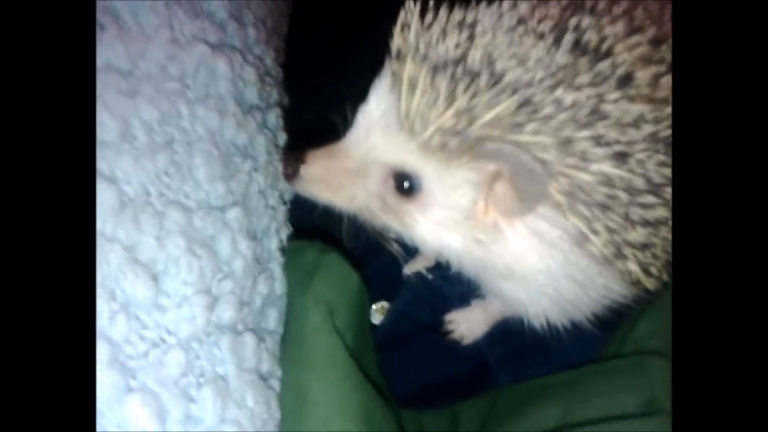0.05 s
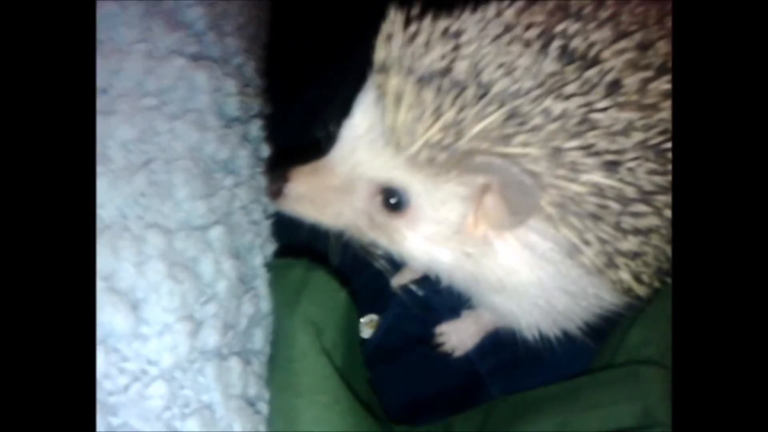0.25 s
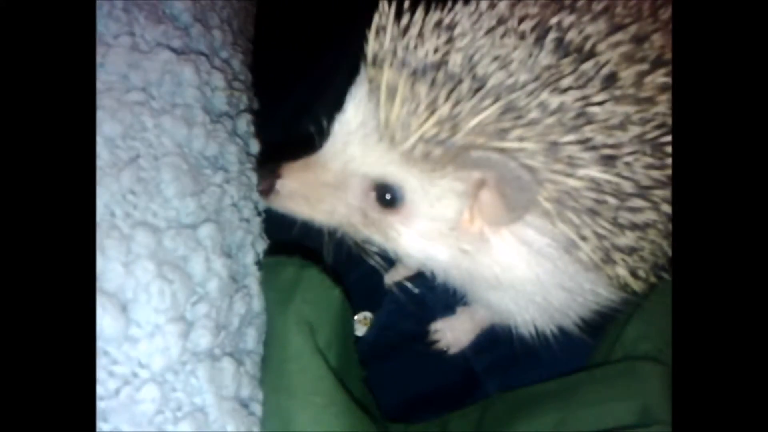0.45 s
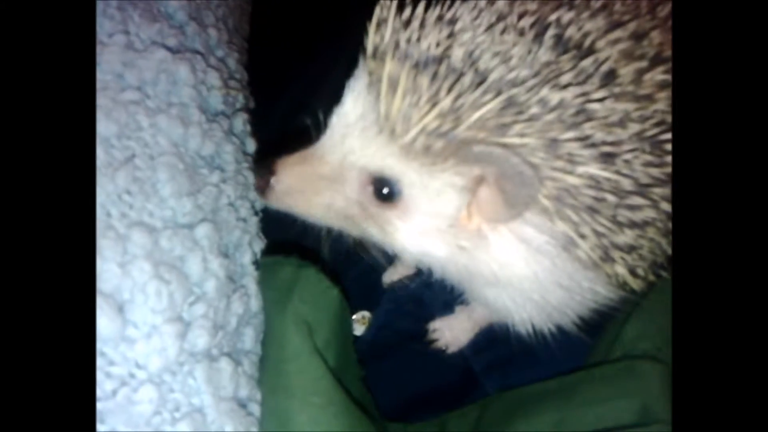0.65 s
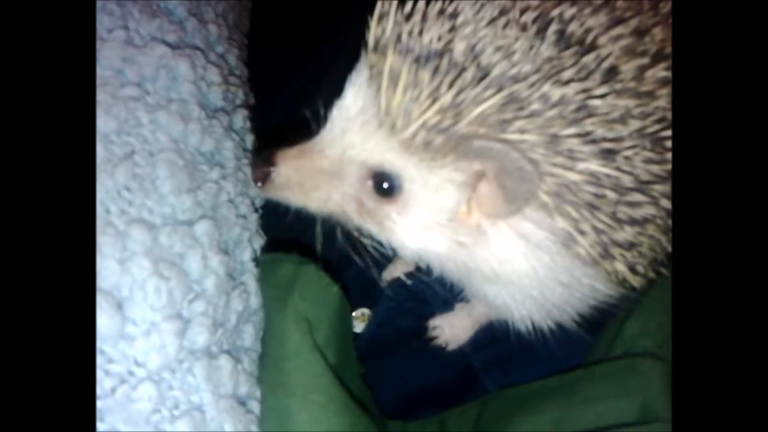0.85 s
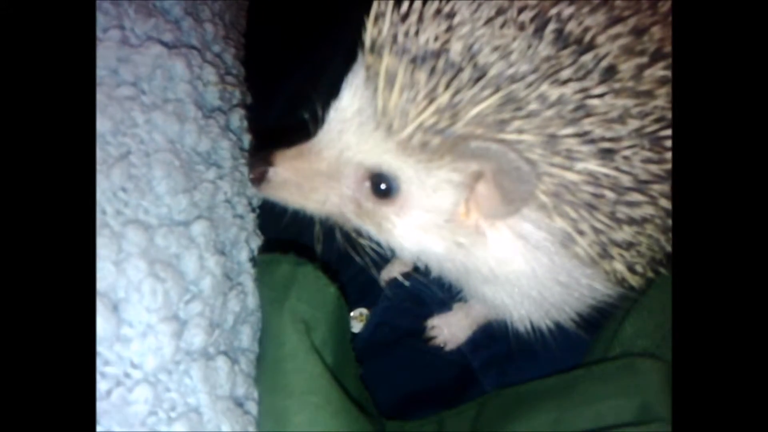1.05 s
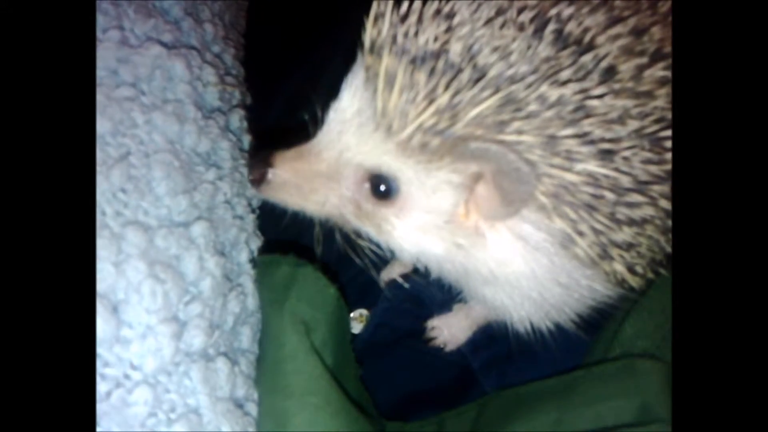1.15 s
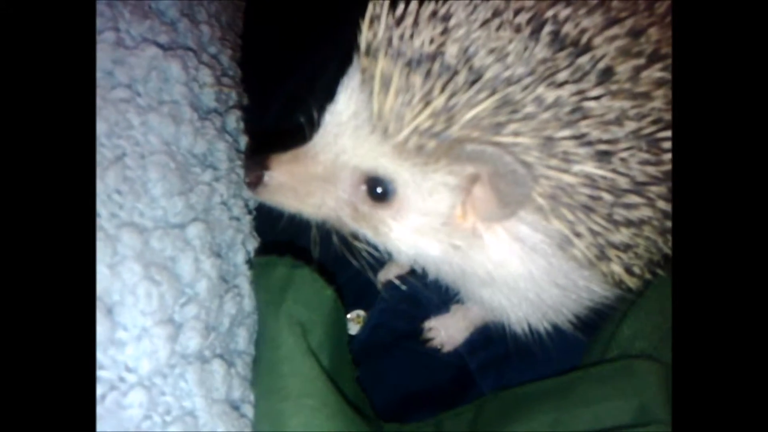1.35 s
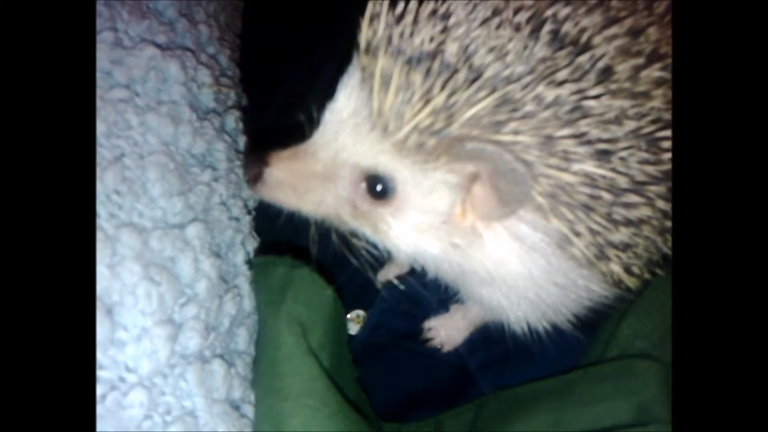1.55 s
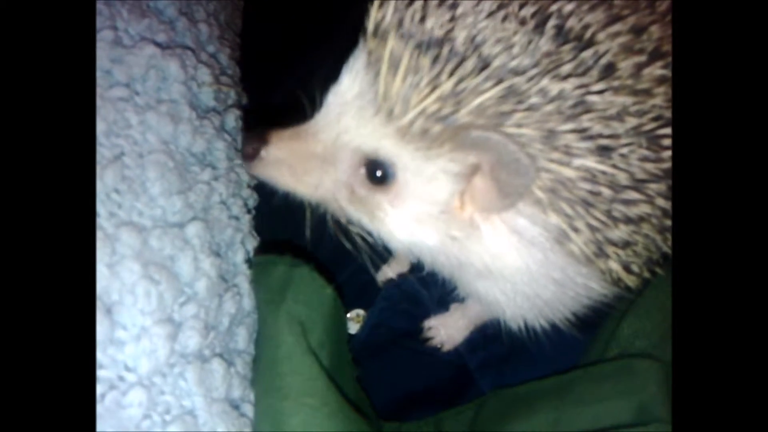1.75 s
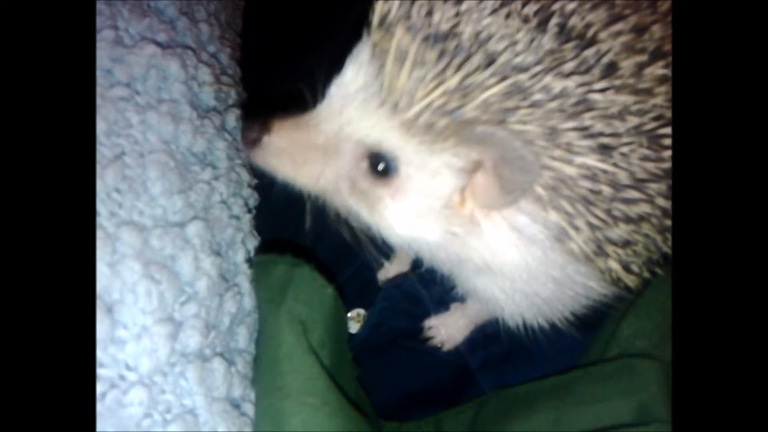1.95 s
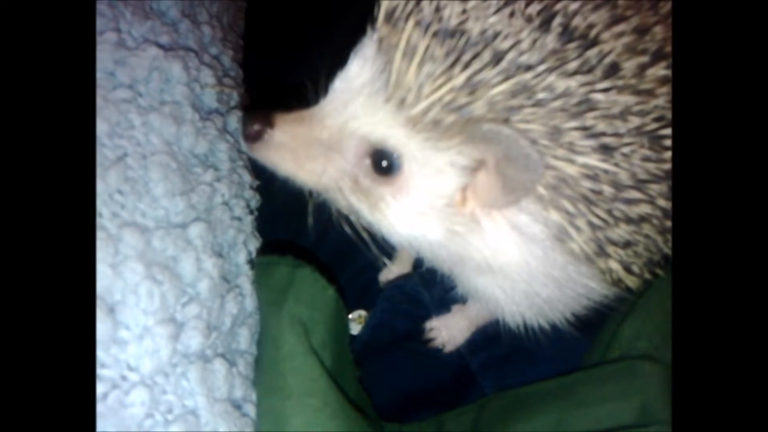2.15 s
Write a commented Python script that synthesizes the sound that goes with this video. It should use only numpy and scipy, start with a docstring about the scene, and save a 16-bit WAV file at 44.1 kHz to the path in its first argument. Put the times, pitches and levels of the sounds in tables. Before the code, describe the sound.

Wet, hollow clicks of a hedgehog's snout, close and slightly left. Fleece rustles softly from the start, with a tiny falling squeak near 0.1 s. Strong clicks begin at 0.23 s, cluster until 0.6, then slow at 0.74 and 0.9, weaker near 1.1 and 1.3. Afterwards only faint ticks, soft pats and scuffs to 2.2 s, over low rumble, faint hum, hiss and thin high whines.

```python
"""Short wet clicks come in a slowing, fading run, close by, as a hedgehog noses at a fleece blanket.
The fleece rustles and squeaks faintly at first, then only stirs under soft pats, in a quiet room.
Under it lie a low rumble, a faint hum and the recorder's hiss with two thin whines.
Clicks are damped ringing set off by soft contacts; fleece, pats, rumble and hiss are shaped noise;
squeak, hum and whines are sine waves. Scatter and room echoes of the clicks are fading noise."""
import sys
import numpy as np
from scipy import signal
from scipy.fft import rfft, irfft
from scipy.io import wavfile

SR = 44100
rng = np.random.default_rng(int(sys.argv[2]) if len(sys.argv) > 2 else 0)


def transcribe(u):
    """Save the signal u as a 16-bit wav file named by the first command-line argument.

    u: samples, shape (n,) or (channels, n), limited to [-1, 1]; the rate is SR.
    q: integer samples, one column per channel.
    """
    v = np.clip(np.atleast_2d(u).T, -1, 1)
    q = np.round(v * 32767).astype(np.int16)
    wavfile.write(sys.argv[1], SR, q)


N = 97020
T = np.arange(N) / SR  # time of each sample, in seconds
HZ = np.maximum(np.fft.rfftfreq(N, 1 / SR), 1)  # the frequencies that make up a sound of this length

# what the bright part of a click rings with, before each click's own pitch factor:
# (pitch [Hz], width [Hz], level [dB])
SNAP_RINGING = [(3023, 465, -2.5), (3700, 495, -3.3), (5170, 760, 1.5)]


def from_db(db):
    """Turn decibels into a gain to multiply by."""
    return 10 ** (np.asarray(db) / 20)


def rms_one(x):
    """Scale a sound to an average power of one."""
    return x / np.sqrt(np.mean(x ** 2) + 1e-20)


def at_hz(points):
    """Read a table between its points, with frequency spaced by octaves."""
    hz, value = np.transpose(points)
    return np.interp(np.log(HZ), np.log(hz), value)


def pan(right_db):
    """Left and right gains: the left stays as it is, the right changes by right_db."""
    return from_db([[0], [right_db]])


def cut(x, hz, kind, order=2):
    """Remove the treble ("low" passes) or the bass ("high" passes) with a smooth filter."""
    sections = signal.butter(order, min(hz, .45 * SR), kind, fs=SR, output="sos")
    return signal.sosfilt(sections, x + 1e-18)


def colour(x, spectrum):
    """Make some pitches of a steady noise stronger than others, then set its power to one."""
    shaped = rfft(x) * from_db(at_hz(spectrum))
    return rms_one(irfft(shaped, N))


def stereo_noise(likeness):
    """White noise whose two channels are alike (1), unrelated (0) or opposed (-1)."""
    mid, side = rfft(rng.standard_normal((2, N)))
    likeness = np.clip(likeness, -.99, .99)
    shared = np.sqrt((1 + likeness) / 2) * mid
    opposed = np.sqrt((1 - likeness) / 2) * side * [[1], [-1]]
    return irfft(shared + opposed, N)


def drift(rate):
    """Random wandering with spread 1; it is weak at frequencies above rate [Hz]."""
    smooth = rfft(rng.standard_normal(N)) / (1 + (HZ / rate) ** 2)
    return rms_one(irfft(smooth, N))


def delayed(x, seconds):
    """The same sound, later."""
    return np.interp(T - seconds, T, x, left=0, right=0)


def ring(strikes, modes):
    """Soft contacts (s, dB, top Hz, pitch factor) set off fading tones, a little different each time."""
    vary_db, size = .9, 2048  # chance spread of each tone's level; length of each ring in samples
    out = np.zeros(N)
    impulse = np.eye(1, size)[0]
    for s, level_db, top_hz, factor in strikes:
        contact = cut(impulse, top_hz, "low", order=4)  # a softer contact has less treble
        i = int(s * SR)
        for k, (hz, width, db) in enumerate(modes):
            r = np.exp(-np.pi * width * factor / SR)  # a wider mode fades sooner
            w = 2 * np.pi * hz * factor / SR
            sign = (-1) ** k
            gain = sign * from_db(level_db + db + vary_db * rng.standard_normal())
            tone = signal.lfilter([.5, 0, -.5], [1, -2 * r * np.cos(w), r * r], contact)
            out[i:i + size] += gain * tone
    return out


def rumble():
    """Low room rumble: noise that is strongest in the bass and much alike in both channels."""
    # strength of each pitch in the rumble: (frequency [Hz], level [dB])
    rumble_colour = [(20, 6), (45, -16), (70, 6), (120, 3.5), (180, 7), (230, -0.5), (310, -8.5), (420, -8),
                     (700, -14), (1500, -19), (4000, -19), (15000, -25)]
    noise = stereo_noise(.75)
    return from_db(-59.5) * pan(right_db=-3) * colour(noise, rumble_colour)


def hiss():
    """The recorder's hiss: noise shaped by pitch, its level sinking unevenly."""
    # strength of each pitch in the hiss: (frequency [Hz], level [dB])
    hiss_colour = [(100, 2), (1000, -9.5), (2000, -10), (3200, -3), (4500, -1.5), (6000, -2), (7500, -6),
                   (10000, -2), (11500, 2.5), (15500, 1)]
    # how alike left and right are, later held within -0.99 and 0.99: (frequency [Hz], likeness [1])
    hiss_likeness = [(500, -0.31), (2400, 0.21), (4400, -0.39), (7500, -1.15), (11500, -0.66),
                     (15000, -0.76)]
    # changes over time, added to the base level: (time [s], level [dB])
    hiss_level = [(0, 4), (.3, 3), (.6, 0.5), (1.0, 2), (1.4, 0.4), (1.8, 1.5), (2.2, 0)]
    base_db = -49
    level_db = base_db + np.interp(T, *np.transpose(hiss_level))
    noise = stereo_noise(at_hz(hiss_likeness))
    return from_db(level_db) * pan(right_db=-0.2) * colour(noise, hiss_colour)


def hum():
    """A faint low sine wave, almost only on the left, wavering in level and slightly in phase."""
    hum_hz, hum_db, waver_db = 153.8, -67.5, 3.0
    level = from_db(hum_db + waver_db * drift(1.2))
    phase = 2 * np.pi * hum_hz * T + .5 * drift(2.7)
    return pan(right_db=-50) * level * np.sqrt(2) * np.sin(phase)


def whines():
    """Two thin, steady electrical sine waves, opposed in the two channels."""
    # pitch of each whine: (frequency [Hz])
    whine_pitches = [11042.5, 12752.8]
    # strength of each whine: (left level [dB], right level [dB])
    whine_levels = [(-53.6, -58.5), (-54.2, -60.5)]
    out = np.zeros((2, N))
    for hz, (left_db, right_db) in zip(whine_pitches, whine_levels):
        gains = from_db([[left_db], [right_db]]) * [[1], [-1]]
        out += gains * np.sqrt(2) * np.sin(2 * np.pi * hz * T)
    return out


def fleece():
    """Rubbing fleece: smooth noise plus the tiny snaps of single fibres."""
    # how strongly the fleece is rubbed: (time [s], level [dB])
    rub_level = [(0, -51), (.1, -50.5), (.2, -53.5), (.29, -71), (.35, -49), (.41, -75), (.52, -60.5),
                 (.68, -69), (1.0, -81), (1.35, -58.5), (1.44, -70.5), (1.56, -57.5), (1.66, -87),
                 (2.2, -62)]
    # strength of each pitch in the rubbing: (frequency [Hz], level [dB])
    rub_colour = [(30, -14), (80, 4), (200, 1), (300, -7.5), (440, 0.5), (560, -6.5), (660, -1.5),
                  (850, -14.5), (1150, -10.5), (1450, -6), (2000, -7), (3200, -8), (5000, -9.5),
                  (7000, -21.5), (9000, -10), (15000, -18)]
    fibres_per_s, spread_db, fibre_db = 2100, 3, -3  # fibre_db is compared with the smooth noise
    snaps = rng.random(N) < fibres_per_s / SR
    sizes = from_db(spread_db * np.minimum(rng.exponential(1, N), 4))
    fibres = snaps * sizes * rng.choice([-1, 1], N)
    noise = stereo_noise(likeness=0.49) + from_db(fibre_db) * rms_one(fibres)
    level_db = np.interp(T, *np.transpose(rub_level))
    return pan(right_db=-1.0) * colour(noise, rub_colour) * from_db(level_db)


def squeak():
    """The nose drags on the cloth: one short falling sine note, roughened in pitch and level."""
    # path of the note: (time [s], pitch [Hz], level [dB])
    squeak_path = [(.045, 515, -76), (.065, 470, -56), (0.086, 429, -55.5), (.105, 417, -53),
                   (.12, 398, -70)]
    rough, flutter_hz = 0.17, 60
    s, hz, db = np.transpose(squeak_path)
    phase = 2 * np.pi * np.cumsum(np.interp(T, s, hz)) / SR + rough * drift(flutter_hz)
    level = np.interp(T, s, from_db(db), left=0, right=0) * (1 + rough * drift(flutter_hz))
    return pan(right_db=-12.5) * level * np.sqrt(2) * np.sin(phase)


def shifts():
    """Soft pats and scuffs as the animal shifts: short swells of noise, each around its own pitch."""
    # pats and scuffs: (time of peak [s], width of swell [s], level [dB], pitch [Hz])
    pats = [(.107, 0.01, -55, 179), (.186, 0.0072, -55, 610), (.256, 0.0039, -54, 583),
            (0.343, 0.014, -52.5, 1450), (0.905, 0.016, -52.5, 1700), (1.332, 0.0044, -49.5, 570),
            (.68, 0.014, -55, 115), (1.14, 0.018, -55, 101), (1.256, 0.0022, -53.5, 438),
            (1.38, 0.017, -52, 131), (1.458, 0.0044, -56, 470), (1.526, 0.0046, -61, 560),
            (1.551, 0.014, -54, 152), (1.565, 0.02, -58.5, 384), (1.578, 0.022, -61.5, 75),
            (1.749, 0.0092, -57.5, 378), (1.751, 0.0054, -50.5, 161), (1.803, 0.0058, -56, 310),
            (1.84, 0.0074, -61.5, 555), (2.03, 0.0036, -57, 180), (2.176, .02, -52.5, 171),
            (2.18, 0.034, -58, 337)]
    width_octaves = .7
    half = 2 ** (width_octaves / 2)
    out = np.zeros((2, N))
    for s, width, db, hz in pats:
        bass_removed = cut(stereo_noise(likeness=0.52), hz / half, "high")
        band = rms_one(cut(bass_removed, hz * half, "low", order=4))
        swell = np.exp(-.5 * ((T - s) / width) ** 2)
        out += from_db(db) * swell * band
    return pan(right_db=-3) * out


def crackle(s, snap_db, count):
    """The wet film parts in tiny uneven snaps scattered just after each click."""
    from_s, to_s, crackle_db, top_hz = 0.0026, 0.0072, -20.5, 5000  # the level is added to the snap's
    lag, size = rng.random((len(s), 2, count)).transpose(1, 0, 2)
    when = s[:, None] + from_s + (to_s - from_s) * lag
    level_db = snap_db[:, None] + crackle_db + 20 * np.log10(.5 + size)
    strikes = [(t, db, top_hz, 1) for t, db in zip(when.flat, level_db.flat)]
    return ring(strikes, SNAP_RINGING)


def snout():
    """A bright snap, hollow knock and low thump make each click; the upper two echo from close by."""
    # snout clicks, before the level of each part is added: (time [s], low thump level [dB],
    # middle knock level [dB], bright snap level [dB], sharpness of contact [Hz],
    # thump pitch [Hz], knock pitch [Hz], snap pitch [Hz])
    click_list = [(0.169, -47, -42, -48, 3800, 115, 1470, 3000),
                  (0.2102, -50, -43, -46, 2600, 120, 1470, 3000),
                  (0.2202, -56, -45, -38, 4000, 112, 1470, 3000),
                  (0.2281, -29.5, -16, -20.5, 3140, 106, 1360, 3120),
                  (0.3070, -29.5, -13, -19.5, 4350, 118, 1385, 3000),
                  (0.3207, -32, -21.5, -26.5, 3040, 93, 1390, 2970),
                  (.3470, -55, -46, -38, 3800, 117, 1470, 3000),
                  (0.3763, -44, -42, -43, 2300, 116, 1500, 3000),
                  (0.4296, -50, -37, -29.5, 3080, 116, 1550, 3000),
                  (0.4513, -25.5, -13, -13.5, 4200, 112, 1380, 3000),
                  (0.4982, -29.5, -17.5, -16, 3750, 110, 1320, 3040),
                  (0.5927, -27, -17, -14, 3580, 103, 1354, 2980),
                  (0.7357, -29, -19, -17.5, 3030, 105, 1375, 3130),
                  (0.8795, -47.5, -48, -34.5, 3750, 104, 1470, 2960),
                  (0.9032, -32.5, -22.5, -25, 2960, 100, 1354, 3130),
                  (1.1060, -32, -30.5, -34.5, 3860, 109, 1330, 3100),
                  (1.1237, -48, -36, -37, 3240, 118, 1330, 3000),
                  (1.3073, -46.5, -48, -39, 3700, 119, 1520, 2980),
                  (1.3289, -34, -34.5, -28.5, 3530, 125, 1370, 2780),
                  (1.4577, -52, -44.5, -40, 4200, 180, 1420, 3000),
                  (1.5234, -49.5, -48, -46, 3000, 136, 1390, 3000),
                  (1.554, -52, -51, -38, 3660, 128.4, 1470, 2920),
                  (1.7511, -47, -45, -35.5, 2620, 96, 1520, 3130)]
    # ringing of thump and knock before each click's pitch factor: (pitch [Hz], width [Hz], level [dB])
    thump_modes = [(99, 137, -4.5), (160, 396, 5), (440, 154, -12.5)]
    knock_modes = [(603, 175, -11.5), (1400, 430, 3), (2305, 457, -0.06)]
    # surfaces close by: (delay [s], level [dB])
    near_echoes = [(.00127, -13.5), (.005, -28)]
    added_thump_db, added_knock_db, added_snap_db, added_crack_db = 6.5, 0.5, 3, -8
    snap_lead_s, thump_lag_s = .00057, 0.00035  # the treble comes first, the bass last
    s, thump_db, knock_db, snap_db, top_hz, thump_hz, knock_hz, snap_hz = np.transpose(click_list)

    thump_factor = thump_hz / thump_modes[0][0]
    thump = ring(zip(s + thump_lag_s, thump_db + added_thump_db, top_hz, thump_factor), thump_modes)
    thump = cut(thump, 65, "high")

    knock_factor = knock_hz / knock_modes[1][0]
    knock = ring(zip(s, knock_db + added_knock_db, top_hz, knock_factor), knock_modes)

    snap_s = s - snap_lead_s
    snap_factor = snap_hz / SNAP_RINGING[0][0]
    snap = ring(zip(snap_s, snap_db + added_snap_db, top_hz, snap_factor), SNAP_RINGING)
    snap = -cut(snap, 6900, "low", order=6)
    # the faint top of the snap: one mode (Hz, width Hz, dB) at the same pitch every time
    crack_modes = [(9600, 2800, 0)]
    snap += ring(zip(snap_s, snap_db + added_crack_db, 2 * top_hz, np.ones(len(s))), crack_modes)
    snap += crackle(s, snap_db, count=5)

    out = pan(right_db=-1) * thump
    for part, right_db in ((knock, -5.5), (snap, -12)):
        echoes = sum(from_db(db) * delayed(part, lag) for lag, db in near_echoes)
        out = out + pan(right_db) * (part + echoes)
    return out


def tail(x, t60, db, top_hz):
    """Many blurred echoes, different in each ear, that fade by 60 dB in t60 seconds."""
    t = T[:SR // 2]
    noise = cut(rng.standard_normal((2, len(t))), top_hz, "low")
    echoes = noise * from_db(-60 * t / t60) * (1 - np.exp(-t / 0.0006))
    echoes /= np.sqrt(np.sum(echoes ** 2, axis=1, keepdims=True))
    return from_db(db) * signal.fftconvolve(x, echoes, axes=1)[:, :N]


def room(x):
    """Quick scatter off the folds around the animal, a short room tail and a longer bass boom."""
    scatter = tail(x, t60=0.013, db=-17, top_hz=5070)
    short_tail = tail(x, t60=0.092, db=-24, top_hz=3580)
    boom = tail(x, t60=0.42, db=-24.5, top_hz=260)
    return scatter + short_tail + boom


def scene():
    """Add up the room, the blanket and the animal; only the clicks get room echoes."""
    background = rumble() + hiss() + hum() + whines()
    blanket = fleece() + squeak() + shifts()
    clicks = snout()
    return background + blanket + clicks + room(clicks)


def record(dry):
    """A steep filter takes away the treble above its cutoff."""
    cutoff_hz = 15500
    return signal.sosfilt(signal.ellip(12, .1, 70, cutoff_hz, fs=SR, output="sos"), dry)


dry = scene()
out = record(dry)
transcribe(out)
```